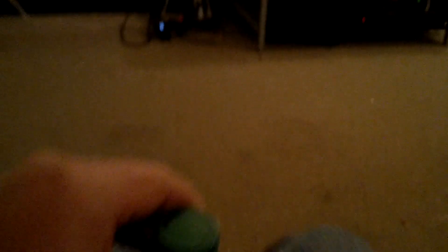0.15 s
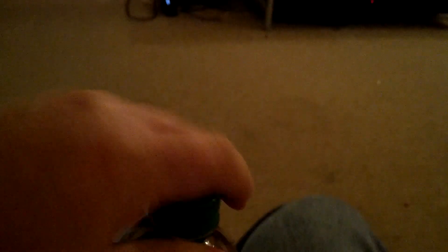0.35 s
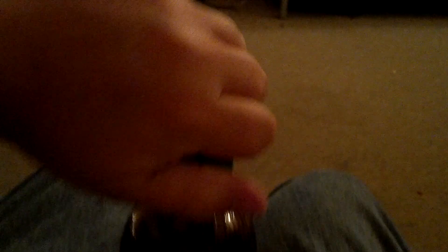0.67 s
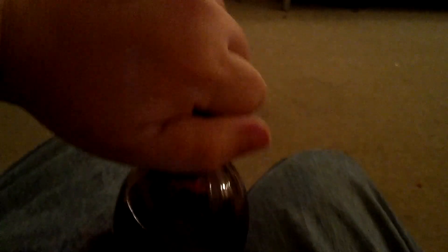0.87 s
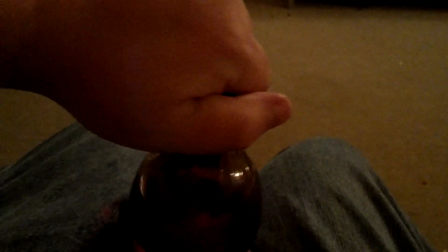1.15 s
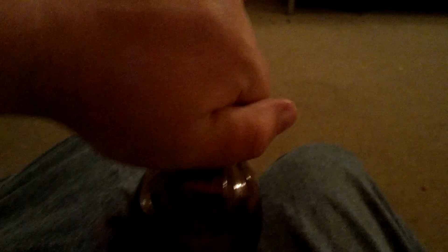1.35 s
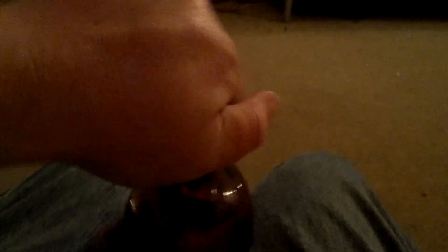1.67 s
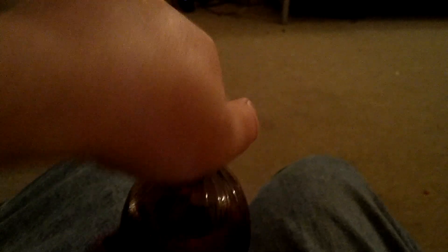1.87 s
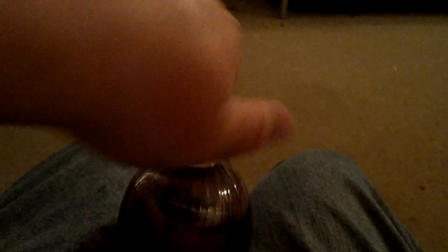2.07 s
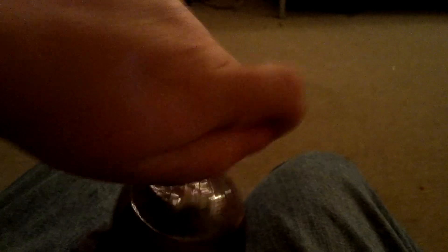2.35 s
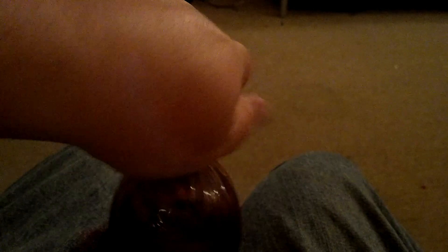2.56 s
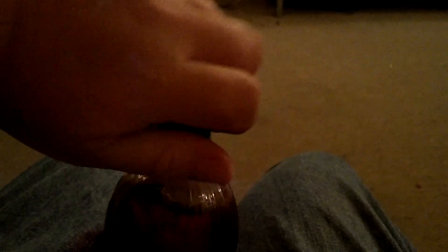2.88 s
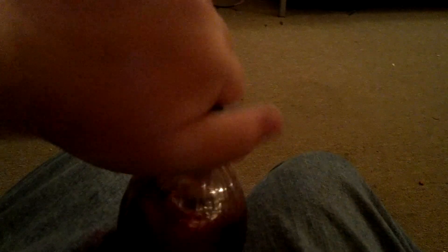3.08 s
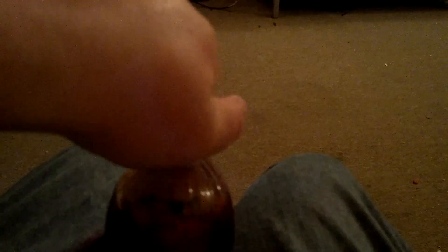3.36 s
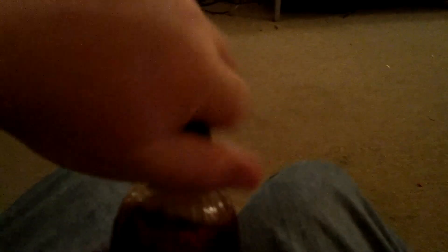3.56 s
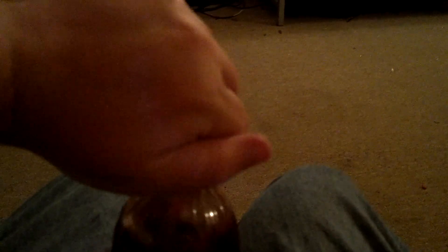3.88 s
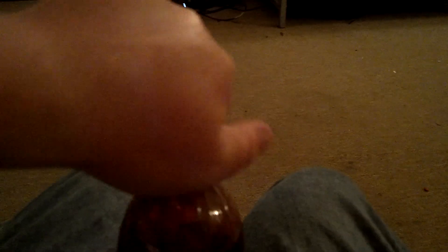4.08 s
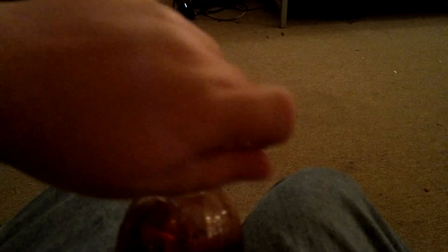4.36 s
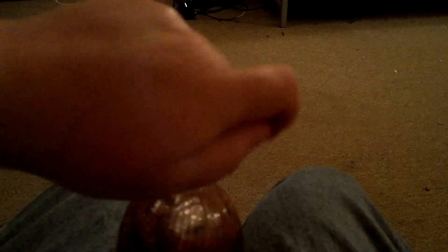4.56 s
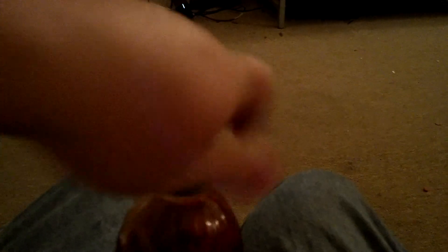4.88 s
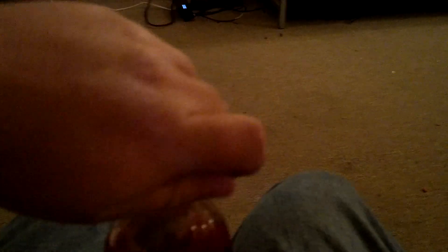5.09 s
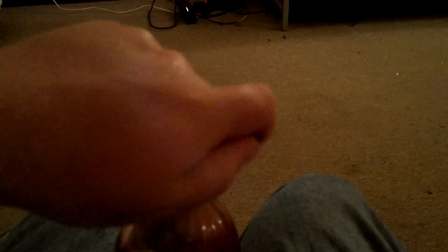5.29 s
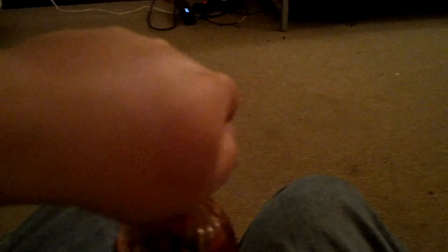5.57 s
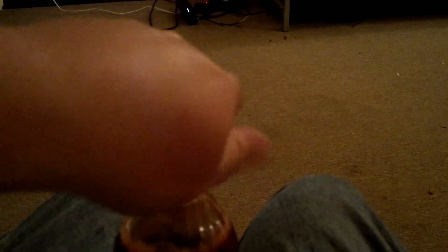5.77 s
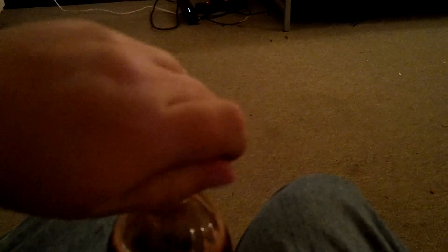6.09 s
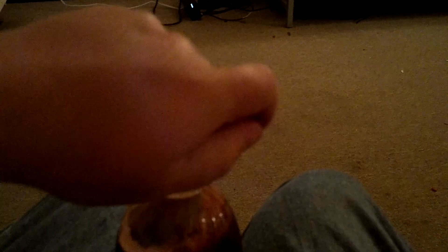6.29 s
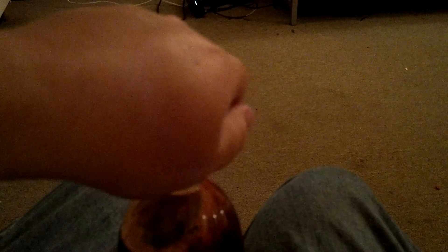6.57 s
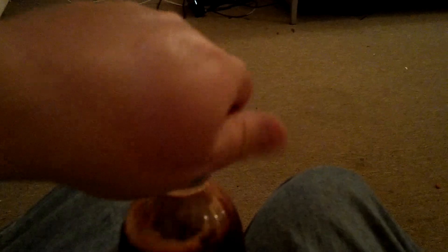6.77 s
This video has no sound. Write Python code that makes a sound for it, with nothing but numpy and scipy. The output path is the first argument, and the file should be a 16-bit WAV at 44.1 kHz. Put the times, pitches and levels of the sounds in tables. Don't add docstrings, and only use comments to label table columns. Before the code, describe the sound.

A quiet indoor room with low fan rumble and faint mains hum, heard close on a phone. A plastic snap at 0.15 s comes with skin rubbing a ribbed cap and thin whistling gas; a stronger snap follows at 0.55. Soft palm rustles and a faint high hiss continue, with a small tick at 1.77. At 1.9 a breathy, whistling jet of gas opens for about 0.4 s, capped at 2.34 by a snap and a very short bright spurt. Small clicks and grip noises run from 2.6 to 3.5. A loud crack hits at 3.9, another at 4.6 just after lighter snaps, a weak one at 5.3. Quiet rubbing and faint whistles lead to a last hard, lower crack at 6.29, then soft handling to about 6.8. After loud hits the background sinks suddenly and gradually returns.

```python
import sys
import numpy as np
from scipy import signal
from scipy.fft import rfft, irfft, next_fast_len
from scipy.io import wavfile
from scipy.ndimage import uniform_filter1d, map_coordinates

SR = 44100
rng = np.random.default_rng(int(sys.argv[2]) if len(sys.argv) > 2 else 0)


def nominal_scale(level):
    x = np.asarray(level, float) / 20
    return 10 ** x


def digitize_waveform(pressure):
    field = np.atleast_2d(pressure).T
    bounded = np.clip(field, -1, 1)
    quanta = np.round(bounded * 32767).astype(np.int16)
    wavfile.write(sys.argv[1], SR, quanta)


N = 305832

# [t/s, peak level/dB, ring struck most (0-3), loss per ring away from it/dB,
# tuning of the rings under the grip (ratio)]
SNAPS = [(0.1506, -23, 3.1, 6, 1.05), (0.5545, -13, 2.5, 12.5, 1.2), (1.7744, -34.5, 1.8, 3.5, .95),
         (2.3365, -26.5, 1.6, 6, 0.68), (2.6606, -37.5, 2.05, 11.5, 0.79), (3.001, -40, 3.3, 4.5, 0.9),
         (3.1273, -39, 2.95, 12, 0.96), (3.4855, -50.5, .1, 0.5, 0.86), (3.8913, -8, 0.47, 2.5, 0.91),
         (4.53, -28, 1.66, 7, .83), (4.6205, -33.5, 1.5, 6.5, 1.01), (4.6258, -10, 1.3, 12.5, 0.79),
         (5.2852, -35, 1.7, 7, 0.68), (6.2902, -8.5, .05, 10.5, 1.01)]
# [f/Hz, width/Hz, share of tearing that feeds it]
CAP_RINGS = [(2550, 1200, .025), (4500, 1500, .035), (8700, 3200, .12), (13500, 4000, .25)]
# [f/Hz, width/Hz, level re that ring/dB]
BOTTLE_WALL = (1400, 2100, 0.5)
# [f/Hz, width/Hz, level re the lowest ring/dB]
BODY_THUMP = (474, 990, -13)
# [start t/s, length/s, level/dB]
JET_OPENING = (1.901, 0.37, -37.5)
# [start t/s, length/s, level/dB]
BLAST_OPENING = (2.337, 0.076, -27)

SEEP_FIELD = [(6920, -11.5, 6.5, -0.27, 0.15), (9400, -2.5, 4.5, -0.14, 0.04),
              (11000, -28.5, 11.5, -0.23, -0.0069), (12100, 2.5, 5, -0.68, 0.046),
              (13380, -1, -15, -1.02, 0.036), (14200, 3, -0.5, -0.27, -0.086),
              (15270, 2.5, -2, -0.33, -0.02)]
JET_FIELD = [(2000, -14, 0.0, -0.38, 0.18), (2650, -5.5, 4, 0.24, -0.28), (3700, 3.5, -4, 0.58, -0.5),
             (4500, -10, 4.5, 0.42, -0.0), (5730, -1, -3.5, 0.41, 0.13), (6300, -5, -6, 0.77, 0.069),
             (7430, -6, 1.5, 0.19, 0.38), (8900, -8.5, -2, 0.43, 0.49), (9800, -8, -0.2, 0.04, 0.11),
             (11500, -7, 0, -0.25, -0.23), (13000, -8, -0.5, -0.31, 0.04), (15200, -9.5, -2, -0.21, -0.08)]
BLAST_FIELD = [(1500, -26, 4.5, -0.07, 0.16), (2420, -49, 47, 0.16, -0.09), (3240, -2, -3, 0.63, -0.42),
               (4550, -10.5, 2, 0.2, 0.2), (7000, -11.5, 1, 0.22, -0.03), (8600, -10, 6, 0.09, 0.11),
               (9800, -6.5, 1, 0.36, 0.17), (12000, -0.5, 1, -0.32, -0.16), (13500, -2, 2, -0.5, 0.14),
               (15200, -0.5, -9.5, -0.23, -0.11)]
GRIP_FIELD = [(1200, -4.5, 3.5, -0.41, 0), (2000, -4.5, -2.5, -.8, 0), (2600, -4, -2.5, -.8, 0),
              (3360, -6, 2, -.4, -.4), (4500, -17.5, 3.5, -.2, -0.23), (6200, -26, 1.5, 0, 0.014)]
RUB_FIELD = [(3500, -12, 0, .1, 0.0026), (5630, 4, 0, .2, 0.016), (8900, -4.5, 0.0025, 0.101, 0.0013),
             (12000, 4.5, 0.0018, 0, 0.0064), (15000, -10, 0, 0.046, 0)]
ROOM_FIELD = [(45.2, 27, -16, 0, 0.3), (83, -3, -8.5, .3, .2), (134, -0.5, -13, 0.53, .2),
              (200, -3, -26, -0.0044, 0.37), (350, -7.5, -11.5, -.1, 0.38), (504, -16.5, -7.5, -0.25, 0.19),
              (770, -23, -5, -.1, 0.23), (1223, -29, -2, -0.063, 0.2), (2000, -34.5, 7, -0.715, .17),
              (3150, -38.5, -9, -0.82, 0), (3300, -43.5, 3, -.45, -.6), (4600, -49.5, 0.5, -.1, 0.072),
              (8200, -59.5, 0, -.05, 0), (13500, -57.5, 0.5, -0.63, 0)]

# [start t/s, end t/s, f/Hz,
# level/dB, left-right level/dB]
WHISTLES = [(0.06, 0.46, 2000, -56, -16), (0.025, .48, 4500, -63.5, -8), (.55, 0.996, 5700, -69, -2),
            (0.709, 1.044, 4060, -68.5, -12), (1.241, 1.88, 12000, -69, 14), (1.266, 1.8, 12900, -68.5, 27),
            (1.275, 1.854, 15300, -66.5, -4), (1.899, 2.31, 3700, -64, 21), (1.92, 2.098, 5040, -64, 5),
            (1.901, 2.1, 8900, -47, 12), (1.894, 1.99, 7500, -49, 16), (2.126, 2.309, 6300, -50.5, 1),
            (2.133, 2.24, 10100, -67.5, 2), (4.688, 4.753, 1700, -49, -1), (5.408, 6.294, 2600, -62, -10),
            (5.497, 6.29, 1900, -64, -6), (5.497, 5.85, 13400, -77.5, -6), (6.029, 6.29, 12500, -74.5, -8),
            (6.03, 6.295, 14400, -74, -1)]
# [start t/s, length/s, turn level/dB, squeeze level/dB]
HAND_MOVES = [(.1, .25, -48, -44), (0.345, 0.075, -50, -47.5), (0.569, .03, -59.5, -62),
              (0.635, .1, -67.5, -48.5), (0.833, 0.045, -63.5, -46), (1.323, 0.4, -51, -42.5),
              (1.563, .16, -53, -49), (1.781, .06, -59.5, -57.5), (2.488, 0.046, -48.5, -40),
              (2.59, 0.32, -64.5, -46), (3.021, .04, -53, -46), (3.299, .15, -68, -63),
              (3.48, .03, -49.5, -47), (3.55, .2, -57.5, -50.5), (3.77, 0.015, -61.5, -57),
              (3.85, .04, -69.5, -60), (3.95, 0.034, -62, -41), (4.182, .02, -53.5, -63),
              (4.25, .25, -67.5, -60.5), (4.54, 0.04, -59.5, -59), (4.7, 0.022, -48, -34),
              (4.842, .015, -52, -43.5), (4.955, 0.16, -57.5, -40.5), (5.29, .015, -61, -64),
              (5.502, .2, -69.5, -47), (5.725, 0.125, -60, -47.5), (5.948, 0.16, -62.5, -50.5),
              (6.198, 0.027, -64.5, -48), (6.55, 0.068, -54, -42.5), (6.7, 0.12, -63, -43.5)]
# [f/Hz, decay time to -60 dB/s, level/dB]
WALL_DECAY = [(1000, .4, 2.5), (2500, 0.89, 0.5), (4500, 0.98, -6), (8000, 0.41, 1), (13500, .36, 8.5)]
# [f/Hz, width/Hz, level/dB]
ROOM_TONES = [(138.9, 5.7, 9), (189.5, 8.9, 7.5), (439.3, 45, 4), (574.5, 3.8, 9.5), (976, 11, 1.5),
              (1334, 28, 5)]
# [f/Hz, rms level/dB]
MAINS_HUM = [(120, -40.5), (240, -45.5), (360, -44.5), (600, -56), (840, -56.5)]
# [t/s, gain level just after/dB]
DUCKS = [
    (0.556, -3),
    (2.34, -15.5),
    (3.894, -20.5),
    (4.627, -19.5),
    (6.289, -23),
]

CROSS_DELAY = 16
TIME = np.arange(N) / SR
FAST = next_fast_len(N, real=True)
HZ = np.fft.rfftfreq(FAST, 1 / SR)


def snaps():
    length, onset = 1024, 40
    low_loss, most_loss_db = 1.35, 9
    t, hz = np.arange(length) / SR, np.fft.rfftfreq(length, 1 / SR)
    out = np.zeros((3, N + length))
    blow = np.zeros((3, length))
    blow[[0, 1, 2], [onset, onset + 10, onset]] = 1
    port_db = np.array([[4], [-4], [4]])
    for s, db, struck, loss_db, tuning in SNAPS:
        away = np.arange(len(CAP_RINGS)) - struck
        higher_db = -np.minimum(loss_db * away, most_loss_db)
        ring_db = np.where(away < 0, low_loss * loss_db * away, higher_db)
        rings = [(tuning * c, w, share, r) for (c, w, share), r in zip(CAP_RINGS, ring_db)]
        rings += [(c, w, .01, r + ring_db[0]) for c, w, r in (BOTTLE_WALL, BODY_THUMP)]
        burst = np.exp(-((t - .0017) / 0.00092) ** 2) * (t > onset / SR)
        tear = rng.standard_normal((3, length)) * burst * [[1], [1], [0]]
        start = round(s * SR) - 26
        for centre_hz, width, share, rel_db in rings:
            body = peak(hz, centre_hz, width) * peak(hz, centre_hz, 2 * width)
            ring = irfft(rfft(blow + share * tear) * body, length)
            ring = ring / abs(ring).max(axis=1, keepdims=True)
            out[:, start:start + length] += nominal_scale(db + rel_db + port_db) * ring
    return out[:2, :N], out[2, :N]


def jet():
    level_db = effort([JET_OPENING], rise=380, fall=200, sag=4)
    return nominal_scale(level_db + wobble(30) - 3) * field(JET_FIELD, patchy_db=2, low_hz=3000)


def blast():
    level_db = effort([BLAST_OPENING], rise=9000, fall=340, sag=22)
    return nominal_scale(level_db + wobble(40) - 3) * field(BLAST_FIELD, patchy_db=1, low_hz=2600)


def seep():
    hiss = field(SEEP_FIELD, patchy_db=2, low_hz=9000)
    return gain_control() * nominal_scale(turning() + wobble(14) - 4) * hiss


def whistles():
    out = np.zeros((2, N))
    hz = np.fft.rfftfreq(SR, 1 / SR)
    for start, end, centre_hz, db, pan_db in WHISTLES:
        width = 4.2 * np.sqrt(centre_hz)
        k, n = round(start * SR), round((end - start) * SR)
        hiss = rfft(rng.standard_normal((2, SR)))
        tone = unit(irfft(hiss * peak(hz, centre_hz, width) ** 2)[:, :n])
        to_edge = np.minimum(np.arange(n), n - np.arange(n))
        fade = np.clip(to_edge / (0.052 * SR), 0, 1)
        out[:, k:k + n] += nominal_scale(db + np.array([[pan_db], [-pan_db]]) / 2) * fade * tone
    return out


def hand():
    rub_db = -63 + 0.65 * (turning() + 60)
    squeezes = [(s, length, db) for s, length, _, db in HAND_MOVES]
    grip_db = effort(squeezes, rise=80, fall=170, rest_db=-63)
    rub = nominal_scale(rub_db + wobble(25) - 5) * field(RUB_FIELD, patchy_db=1, low_hz=3000)
    grip = nominal_scale(grip_db + wobble(12) - 8) * field(GRIP_FIELD, patchy_db=1, low_hz=1200)
    return rub + grip


def turning():
    turns = [(s, length, db) for s, length, db, _ in HAND_MOVES]
    return effort(turns, rise=300, fall=150, rest_db=-74)


def walls(x):
    hz, t, z = signal.stft(rng.standard_normal((2, SR // 2)), SR, nperseg=256)
    f, t60, db = np.transpose(WALL_DECAY)
    level_db = np.interp(hz, f, db)[:, None]
    loss_db = 60 * t / np.interp(hz, f, t60)[:, None]
    tail = signal.istft(z * nominal_scale(level_db - loss_db), SR, nperseg=256)[1]
    late = np.pad(x, (90, 0))[None]
    return signal.fftconvolve(late, tail / np.linalg.norm(tail[0]), axes=1)[:, :N]


def room():
    tones = 1 + sum((nominal_scale(db) - 1) * abs(peak(HZ, c, w)) ** 2 for c, w, db in ROOM_TONES)
    rumble = shaped(field(ROOM_FIELD, patchy_db=0.74, low_hz=113.8), tones)
    hum = np.zeros((2, N))
    for f, db in MAINS_HUM:
        lift = 1 / (2 * np.sin(np.pi * f * CROSS_DELAY / SR))
        line = np.sin(2 * np.pi * f * TIME + [[.04], [-.04]])
        hum += nominal_scale(db + 2.5 + 0.8 * wobble(3.8)) * lift * line
    return nominal_scale(-30.0 + 0.9 * wobble(3.7)) * rumble + hum * nominal_scale([[.7], [-.7]])


def gain_control():
    recover = 9
    db = np.zeros(N)
    for s, after_db in DUCKS:
        k = round(s * SR)
        since = TIME[k:] - s
        fall = db[k] + (after_db - db[k]) * (1 - np.exp(-since / 0.0013))
        db[k:] = np.minimum(0, fall + recover * since)
    return nominal_scale(db)


def field(table, patchy_db, low_hz=0):
    z = signal.stft(rng.standard_normal((2, N + 512)), nperseg=512)[2]
    patches = uniform_filter1d(rng.standard_normal(z.shape[1:]), 6, 0)
    patches = unit(uniform_filter1d(patches, 12, 1))
    noise = signal.istft(z * nominal_scale(patchy_db * patches), nperseg=512)[1][:, :N]
    one, other = rfft(noise, FAST)
    f, *cols = np.transpose(table)
    sum_db, diff_db, lean, lead = [np.interp(np.log(HZ + 1), np.log(f), c) for c in cols]
    like = (lean + 1j * lead) / np.maximum(1, np.hypot(lean, lead) / .97)
    colour = nominal_scale(sum_db) / (1 + (low_hz / (HZ + 1)) ** 6)
    related = like * one + np.sqrt(1 - abs(like) ** 2) * other
    total = irfft(colour * one, FAST)[:N]
    diff = irfft(colour * nominal_scale(diff_db) * related, FAST)[:N]
    return np.array([total + diff, total - diff]) / np.std(total)


def effort(events, rise, fall, sag=0, rest_db=-150):
    t = np.arange(0, N / SR + .002, .001)
    start, length, db = np.transpose(events)[:, :, None]
    before = np.maximum(start - t, 0)
    during = np.maximum(t - start, 0)
    after = np.maximum(t - start - length, 0)
    shape = db - rise * before - sag * during - fall * after
    return np.interp(TIME, t, np.maximum(shape.max(axis=0), rest_db))


def wobble(rate):
    knots = rng.standard_normal(int(N * rate / SR) + 4)
    return map_coordinates(knots, [np.arange(N) * rate / SR])


def peak(hz, centre_hz, width):
    return 1j * hz * width / (centre_hz ** 2 - hz * hz + 1j * hz * width)


def shaped(x, response):
    return irfft(rfft(x, FAST) * response, FAST)[:, :N]


def unit(x):
    return x / np.sqrt(np.mean(x ** 2) + 1e-20)


def scene():
    cracks, breaks = snaps()
    far = room() + nominal_scale(-3) * walls(breaks)
    gas = seep() + jet() + blast() + whistles()
    steady = gain_control() * (far + hand()) + gas
    return cracks + shaped(steady, HZ < 15650)


def roll_off(x):
    return signal.sosfilt(signal.butter(12, 16810, fs=SR, output="sos"), x)


def record(dry):
    late = np.pad(dry[::-1], ((0, 0), (CROSS_DELAY, 0)))[:, :N]
    pair = shaped(dry - late, 1 / (1 + (HZ / 15900) ** 60))
    mix = np.clip(pair, -1, 1)
    return roll_off(mix)


dry = scene()
out = record(dry)
digitize_waveform(out)
```